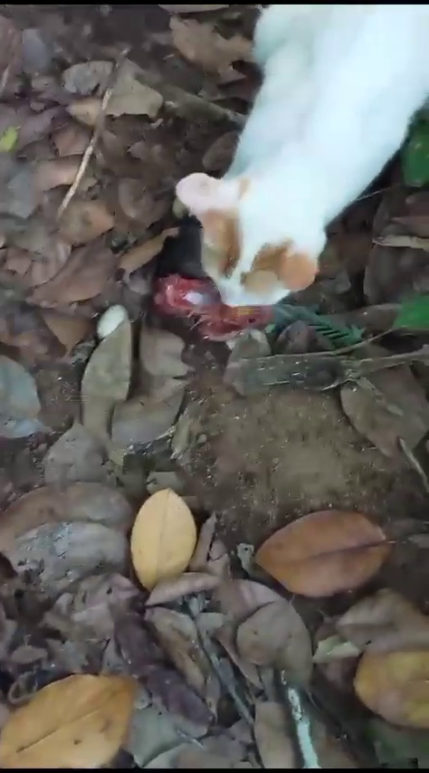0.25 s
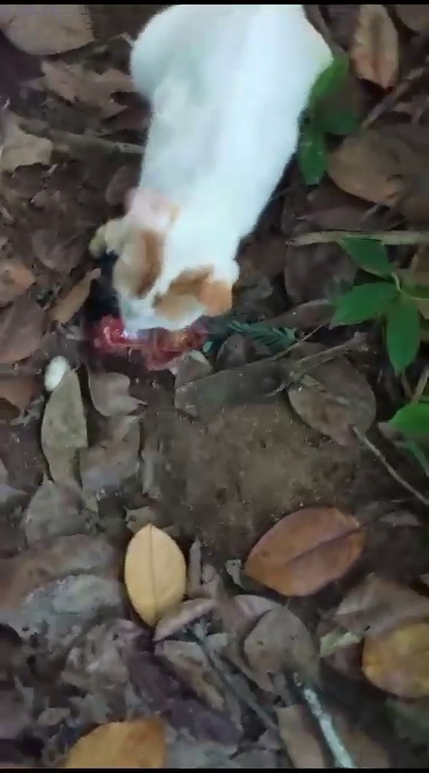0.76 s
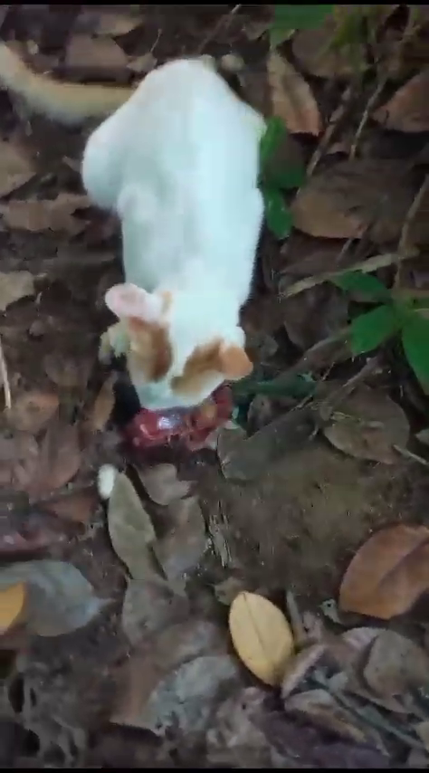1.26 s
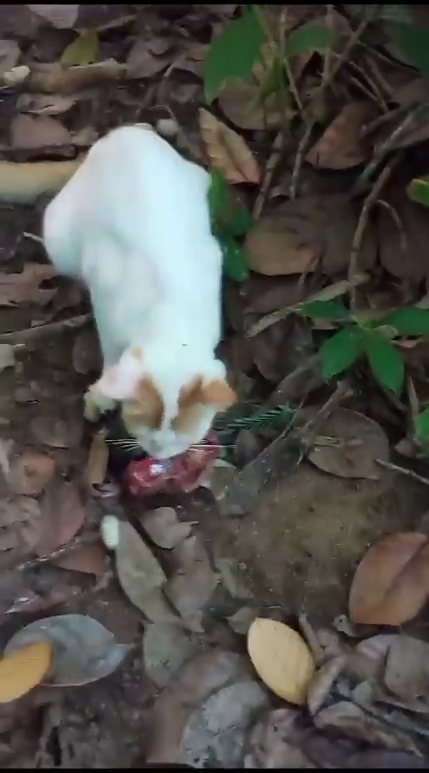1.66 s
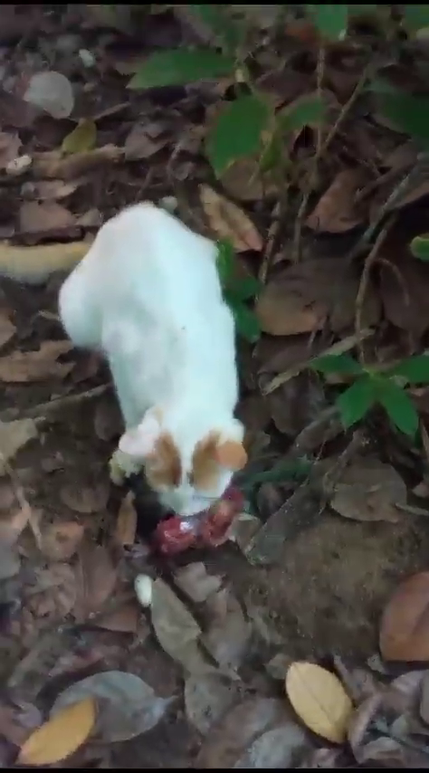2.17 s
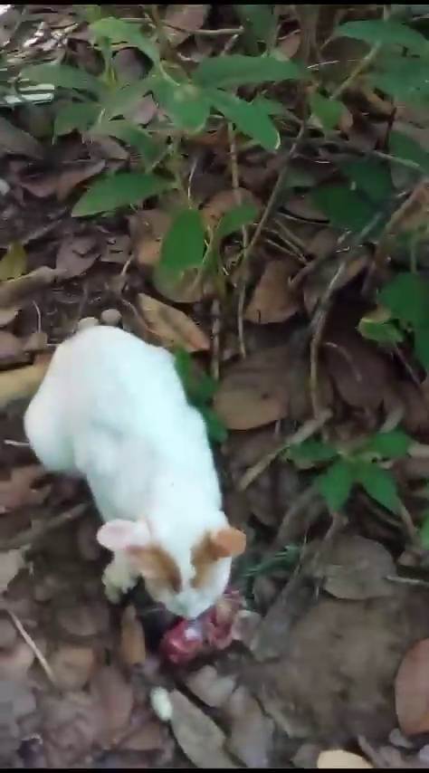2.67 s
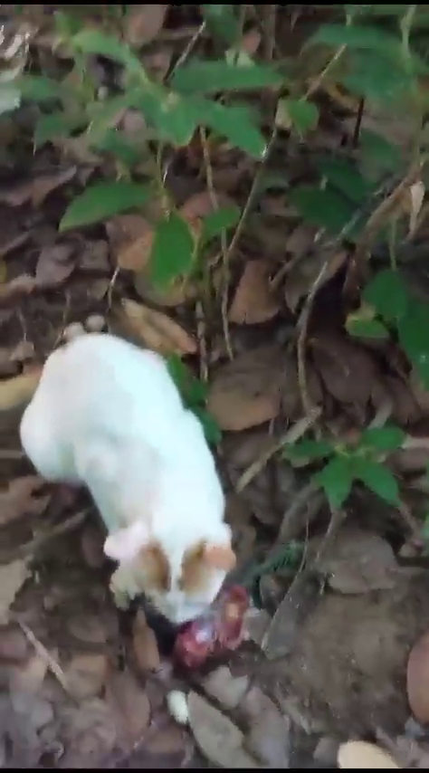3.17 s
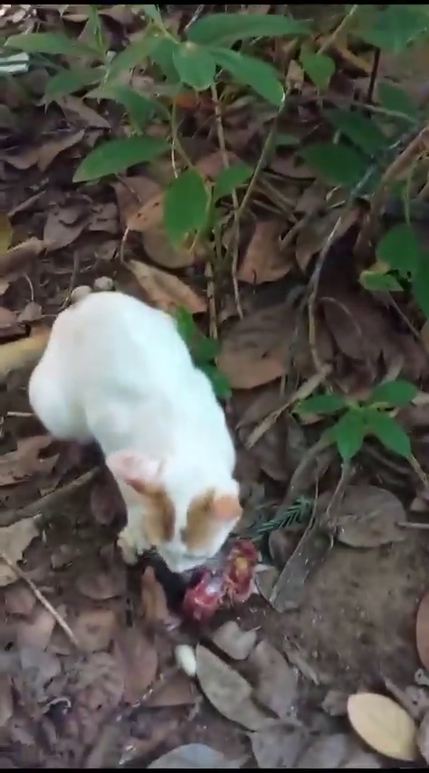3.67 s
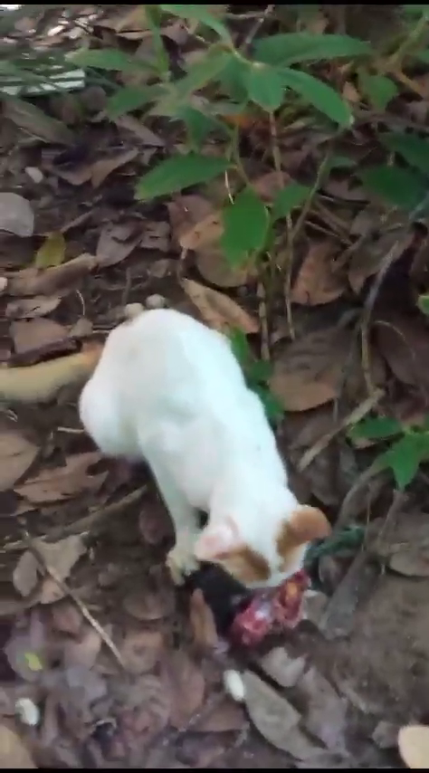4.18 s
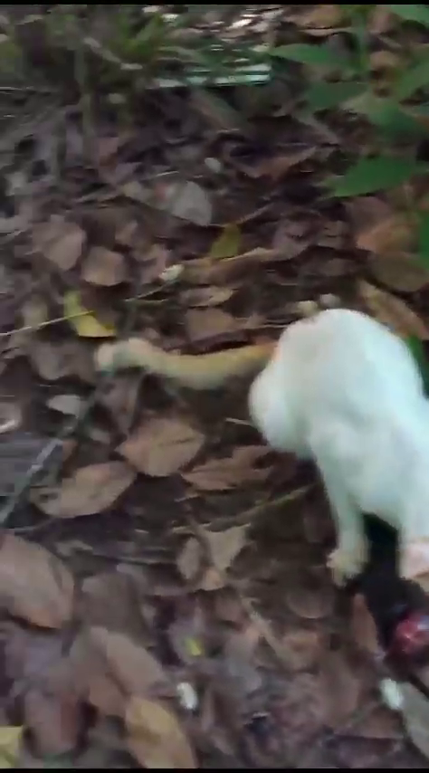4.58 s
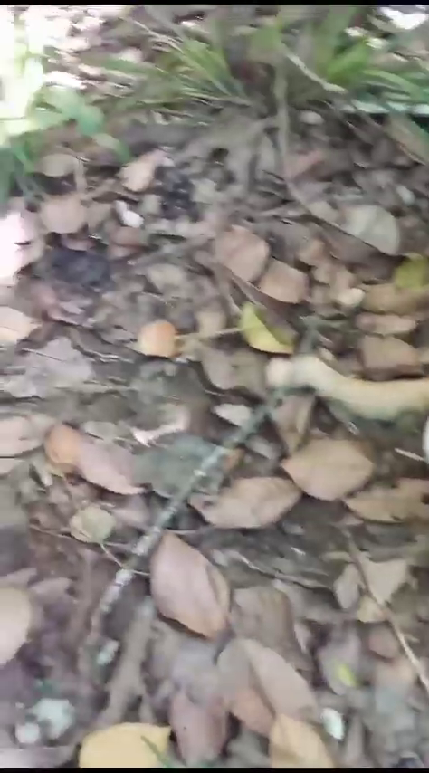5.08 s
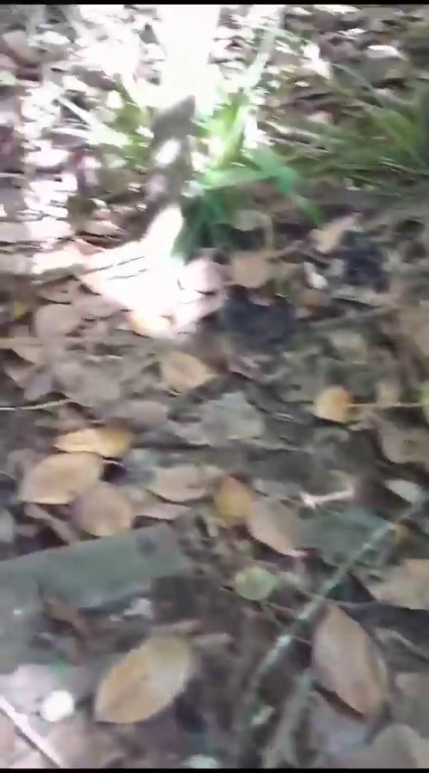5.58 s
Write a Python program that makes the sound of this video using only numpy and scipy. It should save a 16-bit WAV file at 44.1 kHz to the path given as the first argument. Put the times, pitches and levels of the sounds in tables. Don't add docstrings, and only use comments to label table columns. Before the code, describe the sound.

A hand-held microphone is close to dry leaf litter in woodland. Far insects chirr throughout in shrill, rapid clicking over a low, gusty air rumble. From 0 seconds leaves rustle with papery fizz and lower scraping; a small knock comes at 0.3, and the tearing thickens between 0.5 and 0.75 with sharp, brittle snaps. A faint sinking cat moan runs from 0.7 to 1.3 as the rustle eases, with scattered crackles and a soft thump at 1.5. A short, higher mew at 1.9 leads to the loudest event at 2.1: a twig cracks and thuds into soil. Crackling tails off, stirs again at 2.7 with a brief moan, and bursts hard at 3.1. A sharp snap follows at 3.35 and low, weak moans from 3.6 to 3.9. Then only tiny ticks remain as upper insect chirring grows clearer. Near 5.6 a hoarse bird call and thin, clear whistles close the scene.

```python
import sys
import numpy as np
from scipy import signal
from scipy.fft import rfft, irfft, next_fast_len
from scipy.io import wavfile
from scipy.ndimage import uniform_filter1d

SR = 44100
rng = np.random.default_rng(int(sys.argv[2]) if len(sys.argv) > 2 else 0)


def makeup_ratio(level_db):
    decades = np.asarray(level_db, float) / 20
    return 10 ** decades


def wav_record(signal):
    frames = np.transpose(np.atleast_2d(signal))
    bounded = np.clip(frames, -1, 1)
    quanta = np.round(bounded * 32767).astype(np.int16)
    wavfile.write(sys.argv[1], SR, quanta)


N = 256662


def evened(x):
    return x / np.sqrt(np.mean(x ** 2) + 1e-20)


def read(points, hz):
    f, value = np.transpose(points)
    return np.interp(np.log(hz + 1), np.log(f + 1), value)


def curves(rows, t):
    s, *columns = np.transpose(rows)
    return [np.interp(t, s, column) for column in columns]


def add(mix, s, sound):
    part = mix[round(s * SR):][:len(sound)]
    part += sound[:len(part)]


def colour(x, points):
    size = next_fast_len(len(x))
    gain = makeup_ratio(read(points, np.fft.rfftfreq(size, 1 / SR)))
    return irfft(rfft(x, size) * gain, size)[:len(x)]


def band_rms(x, lo_hz, hi_hz):
    hz = np.fft.rfftfreq(len(x), 1 / SR)
    band = rfft(x)[(hz > lo_hz) & (hz < hi_hz)]
    return np.sqrt(2 * np.sum(abs(band) ** 2)) / len(x)


def resonate(x, hz, width_hz):
    r = np.exp(-np.pi * width_hz / SR)
    return signal.lfilter([1 - r], [1, -2 * r * np.cos(2 * np.pi * hz / SR), r * r], x)


def decay(x, seconds):
    return signal.lfilter([1], [1, -np.exp(-1 / (seconds * SR))], x)


def wander(seconds):
    size = max(round(seconds * SR), 2)
    return evened(uniform_filter1d(uniform_filter1d(rng.standard_normal(N), size), size))


def below(x, hz):
    return signal.oaconvolve(x, signal.firwin(511, hz, window=("kaiser", 10), fs=SR), "same")


def voices(notes, overtones, waver):
    out, drift = np.zeros(N), wander(.008)
    for rows in notes:
        t = np.arange(rows[0][0], rows[-1][0], 1 / SR)
        hz, db = curves(rows, t)
        wavering_hz = hz * (1 + waver * drift[(t * SR).astype(int)])
        angle = 2 * np.pi * np.cumsum(wavering_hz) / SR
        tone = sum(makeup_ratio(d) * np.sin(k * angle) for k, d in overtones)
        add(out, t[0], makeup_ratio(db) * tone * signal.windows.tukey(len(t), .15))
    return out


def air():
    # time in seconds, strength of the moving air in dB.
    gust_rows = [(0, 7), (.76, 2.5), (1.33, -1.5), (1.94, 4), (2.43, -1), (3.4, -1), (3.62, 2.5), (4.15, 3),
                 (4.8, -0.5), (5.82, 1)]
    # frequency in Hz, level per Hz in dB.
    rumble_spectrum = [(8.8, -36.5), (15, -19.5), (53, 5), (65, 7.5), (134, 2), (153, -12), (166, -21.5),
                       (200, -18), (260, -48), (440, -120)]
    wash_spectrum = [(88, -31.5), (150, 0.5), (363, -5), (618, -6), (2870, -23), (4870, -16.5), (5480, -19),
                     (6680, -16.5), (9150, -20), (15000, -23.5), (16500, -40.5)]
    gust_db, = curves(gust_rows, np.arange(N) / SR)
    thrash = uniform_filter1d(makeup_ratio(stirring()[1] - 9), size=4000)
    rumble_db = -63 + .7 * gust_db
    wash_db = 20 * np.log10(np.hypot(makeup_ratio(-63 + .75 * gust_db), thrash))
    rumble = colour(rng.standard_normal(N) * makeup_ratio(1.4 * wander(0.035)), rumble_spectrum)
    wash = colour(rng.standard_normal(N) * makeup_ratio(0.98 * wander(0.0413)), wash_spectrum)
    return evened(rumble) * makeup_ratio(rumble_db + 2.5) + wash * makeup_ratio(wash_db - 3.5) / band_rms(wash, 100, 1460)


def chorus(singers):
    out = np.zeros(N)
    for hz, width_hz, per_s, db in singers:
        turns = np.cumsum(per_s * (1 + .0012 * wander(.3))) / SR
        clicks = evened(np.diff(np.floor(turns), prepend=0)) + 1.1 * rng.standard_normal(N)
        ring = resonate(resonate(clicks, hz, width_hz), hz, 2.5 * width_hz)
        out += makeup_ratio(db + 1.3 * wander(.1)) * evened(ring)
    return evened(out)


def insects():
    # time in seconds, lower chorus in dB, upper chorus in dB.
    chorus_levels = [(0, -55, -88), (1.3, -62.5, -66.5), (2.8, -65.5, -86), (3.6, -69, -65.5),
                     (4.4, -68, -66), (4.75, -64, -62.5), (5.82, -62, -60.5)]
    # time in seconds, thin singers in dB.
    thin_levels = [(0, -72), (3.4, -69), (4.4, -66.5), (4.75, -74), (5.82, -78)]
    # ring in Hz, width in Hz, clicks per second, level in dB.
    lower = [(5350, 200, 71, -8), (5650, 220, 63, 0), (5880, 220, 83, -2), (6200, 300, 46, 0)]
    upper = [(6490, 55, 61.5, -2), (6640, 180, 72.5, 0), (6830, 180, 59, -1), (7120, 250, 92, -8),
             (7600, 300, 43, -8)]
    thin_singers = [(5400, 70, 77, -10), (5865, 35, 58, 0), (6320, 45, 69, 0), (6785, 35, 71, 2),
                    (7640, 50, 64, -4), (5697, 25, 66, 0), (8600, 60, 74, -11)]
    t = np.arange(N) / SR
    lower_db, upper_db = curves(chorus_levels, t)
    thin_db, = curves(thin_levels, t)
    return makeup_ratio(lower_db) * chorus(lower) + makeup_ratio(upper_db) * chorus(upper) + makeup_ratio(thin_db) * chorus(thin_singers)


def birds():
    # time in seconds, pitch in Hz, level in dB.
    clear_notes = [
        [(5.64, 4200, -81), (5.73, 4215, -69), (5.8, 4220, -75)],
        [(5.75, 4040, -79), (5.79, 3880, -77), (5.818, 3800, -72)],
    ]
    hoarse_notes = [
        [(5.545, 2480, -78), (5.6, 2520, -74), (5.665, 2460, -78), (5.7, 2420, -83), (5.818, 2450, -83)],
    ]
    clear = voices(clear_notes, [(1, 0)], waver=.002)
    return clear + (.5 + wander(.003)) * voices(hoarse_notes, [(1, 0)], waver=.012)


def cat():
    # time in seconds, pitch in Hz, level in dB.
    moans = [
        [(.72, 645, -69), (.9, 615, -71.5), (1.1, 622, -71.5), (1.35, 590, -84)],
        [(1.86, 828, -64), (1.92, 870, -69), (1.99, 850, -64), (2.09, 858, -66.5)],
        [(2.78, 563, -66), (2.86, 544, -66), (2.95, 596, -87)],
        [(3.56, 296, -66), (3.62, 307.5, -61.5), (3.75, 290, -80), (3.9, 291.4, -66)],
    ]
    # multiple of the pitch, level in dB.
    overtones = [(1, 8), (2, -6), (3, -8)]
    return makeup_ratio(3 * wander(.012) - 6) * voices(moans, overtones, waver=.03)


def thuds():
    # start in seconds, level in dB, pitch factor.
    blows = [
        (0.302, -38.5, 5),
        (1.495, -47, 0.97),
        (2.1082, -15.5, 1.026),
    ]
    # mode in Hz, level in dB, time to fall 60 dB in seconds.
    soil = [(60, -2.5, .064), (128, -8, .06), (200, -8, .03), (290, 1, .015), (520, -1, .009),
            (850, -5, .007), (1200, -8, .007), (1950, -8, .012)]
    out, t = np.zeros(N), np.arange(SR // 3) / SR
    for s, db, factor in blows:
        modes = []
        for hz, mode_db, t60 in soil:
            bend = 2 if hz < 150 else 1
            fall = makeup_ratio(mode_db - 60 * (t * factor / t60) ** bend)
            modes.append(fall * np.sin(2 * np.pi * hz * factor * t))
        add(out, s, makeup_ratio(db) * (modes[0] - sum(modes[1:])))
    return out


def stirring():
    # peak in seconds, fizz in dB, scrape against
    # fizz in dB, rise and fall in seconds per 20 dB.
    stirs = [(.04, -43, -11, 0.043, 0.46), (.2, -50.5, -3, 0.19, 0.56), (0.308, -39.5, -7.5, 0.07, 0.053),
             (.39, -46.5, -1.5, 0.26, 0.19), (.444, -41.5, -5, 0.044, 0.18),
             (0.526, -34, -8.5, 0.037, 0.017), (.6, -37.5, -7, 0.16, 0.22), (.644, -34, -14, 0.049, 0.086),
             (.76, -55.5, -16.5, .2, 0.15), (.93, -47, -12.5, 0.13, 0.11), (1.142, -57, -6.5, 0.8, 0.11),
             (1.59, -45.5, -11.5, 0.26, 0.082), (1.782, -52.5, -19.5, 0.034, 0.32),
             (1.961, -38.5, -15, 0.071, 0.05), (2.065, -45.5, -30, 0.094, 0.09),
             (2.109, -31, -15, 0.0016, 0.39), (2.42, -46.5, -25.5, 0.43, 1), (2.675, -37.5, -9, 0.09, 0.16),
             (2.801, -53.5, -1.5, 0.33, 0.057), (2.886, -51, -12, 0.038, 0.15),
             (3.116, -30, -11.5, 0.037, 0.069), (3.232, -57.5, -3, 0.087, 0.47),
             (3.356, -49.5, -22, 0.12, 0.2), (3.68, -60, -44, 0.24, 0.31),
             (.365, -54, -12, .01, 0.014),
        (2.086, -58, 8, 0.023, 0.012),
        (3.083, -36.5, -5.5, 0.013, 0.15),
        (3.64, -63.5, -21, .08, .08),
        (3.85, -68, -7, 0.075, 0.13),
        (4.04, -69, -23, .1, 0.23),
        (4.22, -67.5, -13, 0.24, 0.29),
        (4.4, -76, -2, 0.17, .2),
        (4.64, -67.5, -26, 0.29, 0.15),
        (5.27, -72, -21.5, .2, .2),
    ]
    t = np.arange(0, N + 64, 64)[:, None] / SR
    s, db, scrape_db, rise_s, fall_s = np.transpose(stirs)
    rise = (s - t) / np.maximum(rise_s, .002)
    fall = (t - s) / np.maximum(fall_s, .002)
    each_db = db - 20 * np.maximum(rise, fall)
    creep_db = -62.5 - 16.5 * np.maximum(t[:, 0] - 3.04, 0)
    fizz = (makeup_ratio(each_db) ** 2).sum(1) + makeup_ratio(creep_db) ** 2
    scrape = (makeup_ratio(each_db + scrape_db) ** 2).sum(1) + makeup_ratio(creep_db - 12) ** 2
    return [np.interp(np.arange(N) / SR, t[:, 0], 10 * np.log10(p)) for p in (fizz, scrape)]


def crackle(per_s, spread_db, ring_s, bed_db, clump_db):
    sizes = makeup_ratio(spread_db * np.minimum(rng.exponential(1, N), 1.4))
    puffs = evened(decay((rng.random(N) < per_s / SR) * sizes, ring_s))
    starts = (rng.random(N) < 60 / SR) * rng.random(N)
    clumps = evened(decay(starts, 0.004))
    return (puffs + makeup_ratio(bed_db)) * makeup_ratio(clump_db * clumps) * rng.standard_normal(N)


def patchy(x, patch_db):
    z = signal.stft(x, nperseg=256)[2]
    field = rng.standard_normal(z.shape)
    field = uniform_filter1d(uniform_filter1d(field, size=7, axis=0), size=7, axis=1)
    field = uniform_filter1d(uniform_filter1d(field, size=5, axis=0), size=4, axis=1)
    return signal.istft(z * makeup_ratio(patch_db * evened(field)), nperseg=256)[1][:N]


def rustle():
    # frequency in Hz, level per Hz in dB.
    fizz_spectrum = [(1500, -38), (2500, -6.5), (3900, -2), (5400, -1.5), (6300, -5), (7200, 6.5),
                     (8400, 2), (12000, 5.5), (15700, 2), (17000, 5.5)]
    scrape_spectrum = [(150, -20), (300, -8), (500, -7.5), (1240, -2), (2000, 1.5), (2450, -6),
                       (3400, -5.5), (4800, -4), (6200, -8.5), (9000, -30)]
    fizz_db, scrape_db = stirring()
    dense = np.clip((fizz_db + 48) / 18, 0, .8)
    still = np.clip((-57 - fizz_db) / 6, 0, 1)
    shared = evened(crackle(per_s=450, spread_db=4.5, ring_s=.0004, bed_db=.5, clump_db=1.8))
    shared = np.sqrt(1 - dense) * shared + np.sqrt(dense) * rng.standard_normal(N)
    edges = np.sqrt(1 - dense) * evened(crackle(410, 2.9, 0.00034, -2.0, 1.38))
    lone = evened(crackle(per_s=240, spread_db=3.0, ring_s=.0004, bed_db=-26, clump_db=2.5))
    edges += still * makeup_ratio(0.5) * lone
    fizz = colour(patchy(shared * (1 - 0.51 * still) + 0.41 * edges, patch_db=2.0), fizz_spectrum)
    scrape = colour(patchy(shared + 0.33 * rng.standard_normal(N), patch_db=2.7), scrape_spectrum)
    fizz *= makeup_ratio(fizz_db) / band_rms(fizz, 8000, 15500)
    return fizz + scrape * makeup_ratio(scrape_db) / band_rms(scrape, 1300, 4800)


def breaks():
    # start in seconds, peak in dB, high ring in Hz,
    # low ring against the high in dB, low ring in Hz.
    cracks = [(.3849, -24, 9550, -10, 4480), (.39, -27.5, 14380, -3, 1980),
              (.5415, -18.5, 11700, -13, 5140), (.6395, -13, 6500, -5.5, 4000),
              (.6489, -20.5, 8200, -6, 4050), (.6603, -14.5, 6760, -8, 4300),
              (.6686, -14.5, 14050, -25.5, 3620), (.7194, -18, 7440, 2.5, 5750),
              (.7594, -22.5, 14200, -33, 5300), (.9149, -25, 10800, -10, 4120),
              (1.0719, -27.5, 14900, -4.5, 4870), (1.3106, -29, 7600, -9.5, 2620),
              (1.4946, -19, 11900, -9.5, 4300), (1.4952, -31.5, 6500, -7, 2100),
              (1.6253, -29.5, 13700, -11, 5300), (1.6938, -28.5, 10600, -4.5, 5370),
              (1.8609, -37, 8800, 0.5, 2000), (1.831, -53, 8000, 6, 1900), (2.0583, -25, 11800, -10, 4500),
              (2.1077, -8, 12200, -5, 4320), (2.1087, -14, 9600, -5, 4090),
              (2.2861, -17.5, 9900, -33, 5000), (2.5006, -29.5, 10600, -4.5, 3370),
              (2.713, -21, 12600, -3.5, 4800), (2.8852, -32, 10500, -4, 4000),
              (3.3441, -17, 11500, -10, 3600), (3.3443, -21, 15300, -21, 1500),
              (3.4566, -35, 9100, 0, 3400)]
    # start in seconds, peak in dB, high ring #
    # in Hz, low ring against the high in dB, low ring in Hz.
    more_breaks = [(0.2158, -35.5, 12600.0, 3, 3530), (0.338, -29, 12500.0, -18, 1550.0),
                   (0.3645, -27.5, 12300.0, -19, 1380.0), (0.212, -39, 6500, 3, 1500),
                   (0.3866, -25, 8500.0, -4, 2000), (0.3925, -32, 6500.0, 3, 1890.0),
                   (0.4816, -29, 12300.0, -15, 2760.0), (0.5321, -26, 7100.0, -11, 5340.0),
                   (0.5931, -25, 11500.0, -9, 5340.0), (0.6268, -26, 13400.0, -6, 5340.0),
                   (0.702, -32, 14000.0, -1, 5340.0), (0.7249, -34, 6500.0, -2, 5080.0),
                   (0.805, -36, 14000.0, -19, 5080.0), (0.8395, -41, 12100.0, -15, 3960.0),
                   (0.8903, -39.5, 8600.0, 1, 3230), (0.9016, -38, 12100.0, -12, 3270.0),
                   (0.919, -35, 14000.0, -4, 5340.0), (0.72, -32.5, 6500, -2, 2400),
                   (0.971, -38, 10100.0, -21, 3790.0), (0.9828, -34, 14900.0, -17, 4650.0),
                   (1.0694, -42, 13100.0, -10, 5340.0), (1.0945, -42, 12100.0, -6, 3700.0),
                   (1.1344, -43, 9400.0, 0, 5250.0), (1.3163, -42, 14900.0, -6, 4310.0),
                   (1.4599, -52, 12100.0, -14, 5080.0), (1.4896, -40, 14500.0, -6, 4130.0),
                   (1.7347, -48, 6500.0, -12, 4480.0), (1.748, -47, 11900.0, -16, 5340.0),
                   (1.8202, -42, 14900.0, -4, 4740.0), (1.988, -29.5, 11500.0, -18, 5340.0),
                   (2.013, -38, 12700.0, -21, 3960.0), (2.022, -42, 9900.0, 5, 5340.0),
                   (2.0253, -37, 13000.0, -16.5, 5000.0), (2.0357, -42, 14500.0, -14, 4390.0),
                   (2.0406, -35, 11500.0, -13, 5080.0), (2.0645, -38, 11000.0, -16, 5340.0),
                   (2.087, -41, 15000.0, 6, 4150), (2.2316, -29, 12400.0, -17, 4220.0),
                   (2.271, -35, 12100.0, -17, 4390.0), (2.372, -29, 12700.0, -10, 4700),
                   (2.4152, -32, 11000.0, -3.5, 4130.0), (2.42, -32.5, 10600.0, -7, 5080.0),
                        (2.4693, -34, 12500.0, -13, 3700.0), (2.4741, -36, 12600, -11, 4310.0),
                        (2.4794, -33, 14600, -12, 4570.0), (2.5535, -34, 14800, -19, 5340.0),
                        (2.5563, -31, 15000.0, -18, 5440), (2.5823, -31, 10200, -17, 1720.0),
                        (2.6323, -38, 12700.0, -1, 4570.0), (2.76, -33.5, 7000.0, -2, 3790.0),
                        (2.7885, -42, 9600.0, 1, 3880.0), (2.8445, -42, 9300.0, -15, 4740.0),
                        (2.8579, -43, 13700.0, -14, 5080.0), (2.8799, -38, 7050, 6, 3900),
                        (2.892, -39, 14500.0, -11, 5340.0), (2.9232, -39.5, 9600.0, -1, 4040),
                        (3.1116, -26, 7400, -11, 4300), (2.992, -44, 7100.0, -2, 4100),
                        (3.1192, -23, 7600, -7, 5070), (3.042, -54, 6900.0, -10, 5080.0),
                        (3.0474, -48, 12100.0, -11, 2500.0), (3.1268, -21, 10300.0, -16, 4740.0),
                        (3.1793, -31, 14000.0, -13, 5170.0), (3.218, -43, 7300.0, -9, 3790.0),
                        (3.2261, -38, 12900.0, -11, 4390.0), (3.235, -39, 9900.0, -16, 4570.0),
                        (3.258, -35.5, 10900.0, -14, 3360.0), (3.2789, -39.5, 9900.0, -4.5, 1720.0),
                        (3.2841, -44, 6900.0, -9, 5340.0), (3.2945, -43, 9900.0, -13, 4910.0),
                        (3.3144, -47, 10400.0, -7, 5340.0), (3.3362, -39, 11700.0, -9, 3450.0),
                        (4.176, -58, 9000, 7, 5040), (3.4255, -45, 10400.0, -13, 4650.0),
                        (3.4485, -46, 7800.0, -9, 5170.0), (3.4606, -40, 13900.0, -12, 5340.0),
                        (3.5584, -53, 8900, -12, 5340.0), (3.7462, -49, 9050, -12, 5340.0),
                        (3.9886, -53, 9000, 8, 4000), (4.2177, -48, 13400.0, -12, 4050.0),
                   (0.77, -18.5, 14500, -5.5, 3280), (.6382, -21, 8000, -1, 1730),
                      (.6438, -29, 11000, 1, 4630), (0.6572, -26, 12000, -14, 4860),
                      (.6584, -19, 13000, -5, 3800), (.6622, -25, 7600, -4.5, 1200), (0.69, -32, 8500, -2, 4400),
                      (2.6755, -24.5, 12000, -7, 2510), (2.683, -29, 11880, -4, 4000),
                      (3.065, -50, 9500, -15, 4500), (3.154, -39.5, 9400, 9, 1350), (4.134, -59, 9000, 1, 3400),
                      (3.9968, -52, 13000, -10, 3800), (4.2463, -51, 13000, -10, 5000),
                      (4.199, -54, 13500, -15, 4500), (4.268, -54, 13500, -15, 4500),
                      (4.666, -56, 13000, -12, 4500), (.5418, -30.5, 7000, -0.5, 1940)]
    # start in seconds, peak in dB, low ring against the high in dB,
    # low ring in Hz.
    edge_snaps = [(0.0578, -28, -5, 5530), (0.156, -37, -0.5, 3480), (0.376, -33, -15, 1560),
                  (.5122, -33, -16, 1770), (0.5285, -19, -18, 5340), (.5742, -28.5, 2.5, 4140),
                  (0.585, -23, -3.5, 5340), (.5966, -22.5, -15, 4430), (0.63, -14, -24, 4000),
                  (0.824, -34, -23, 5400), (.894, -34, -16, 3270), (.9554, -25.5, -14.5, 3960),
                  (1.288, -43, -7, 2110), (1.3475, -41, -2.5, 2700), (1.596, -35, -3, 5300),
                  (1.7372, -40, -2.5, 4400), (1.811, -38, -22, 4220), (2.015, -35, -2, 3400),
                  (2.259, -22, -19, 5200), (2.5116, -30.5, -6, 4800), (2.674, -28, -22, 1770),
                  (2.8038, -29, -6.5, 3960), (2.962, -30, -20, 4670), (3.0101, -31, -17, 4000),
                  (3.0497, -48.5, 10, 2720), (3.1115, -19, -10, 4260), (3.1212, -18, -16, 5100),
                  (3.243, -30, -18, 5200), (3.4084, -36, -14, 3960), (3.4419, -30, -38, 2840)]
    # start in seconds, peak in dB, # high ring
    # in Hz, low ring against the high in dB.
    ticks = [(.817, -35, 14900, -20), (.94, -36, 13260, -25), (.989, -36, 7200, -22),
             (1.4461, -46.5, 7300, 4), (1.6334, -28.5, 11200, -16), (1.6735, -38.5, 7300, -5),
             (1.6984, -29.5, 9600, -11), (2.7278, -37, 10420, -9), (2.8297, -32, 13010, -16),
             (2.938, -36.5, 9500, -20), (3.0214, -44, 10340, -22), (3.267, -37, 9650, -2),
             (3.3997, -35, 11400, -24), (3.4256, -51, 7240, -10), (3.5124, -50, 9910, -6),
             (3.6339, -42, 15160, -18), (3.6435, -45, 12060, -16), (3.7231, -44.5, 7840, -5),
             (3.8531, -53, 14130, 1), (3.9884, -36.5, 14900, -24), (4.0268, -51, 9300, -22),
             (4.042, -44.5, 15100, -23), (4.1619, -50, 14200, -14), (4.1746, -48, 10000, -20),
             (4.2133, -44.5, 13700, -6), (4.24, -46, 13520, -17), (4.2946, -42, 13440, -12),
             (4.5103, -53, 9300, -12), (4.6066, -49, 10400, -26), (4.9862, -47, 8180, -13)]
    high = rng.uniform(10300, 16400, len(edge_snaps))
    low = rng.uniform(3800, 5200, len(ticks))
    edges = [(s, db, hz, *dull) for (s, db, *dull), hz in zip(edge_snaps, high)]
    chance_low = [(*tick, hz) for tick, hz in zip(ticks, low)]
    return cracks + edges + chance_low + more_breaks


def snaps():
    full_top_s = [.5415, .7594, .894, .9149, 1.0719, 1.3106, 1.4946, 1.6253, 1.6938, 2.108, 2.713, 2.938,
                  2.962, 3.0101, 3.0214, 3.3442, 3.4419, 3.9882, 4.2946]
    out, t = np.zeros((2, N)), np.arange(1024) / SR
    rows = breaks()
    noise = rng.standard_normal((len(rows), 2, len(t)))
    noise[:, :, 5] = 4.5
    shape = (1 - np.exp(-t / .0001)) * (np.exp(-t / .0003) + makeup_ratio(-16) * np.exp(-t / .0027))
    thin = signal.butter(3, 3200, "high", fs=SR)
    for (s, db, hz, dull_db, dull_hz), (a, b) in zip(rows, noise * shape):
        high = signal.butter(3, .6 * hz, "high", fs=SR)
        bright = evened(signal.lfilter(*high, a))
        bright += 0.78 * evened(signal.lfilter(*thin, resonate(a, hz, 1400)))
        small = signal.butter(3, .62 * dull_hz, "high", fs=SR)
        ring = resonate(resonate(b, dull_hz, 850), dull_hz, 2400)
        dull = evened(signal.lfilter(*small, ring))
        sound = evened(bright) + makeup_ratio(dull_db - 3.0) * dull
        peak = np.sqrt(uniform_filter1d(sound ** 2, size=31).max())
        full_top = int(np.min(abs(s - np.array(full_top_s))) < .002)
        add(out[full_top], s, makeup_ratio(db + 3.5) * sound / peak)
    return out


def scene():
    steady = air() + insects() + birds() + cat() + rustle()
    soft, hard = snaps()
    return (below(steady + soft, 15850) + below(hard + thuds(), 16650))[None]


def top_cut(x):
    return signal.sosfilt(signal.butter(12, 17140, fs=SR, output="sos"), x)


def record(dry):
    held = dry / (1 + abs(dry) ** 6) ** (1 / 6)
    return top_cut(held)


dry = scene()
out = record(dry)
wav_record(out)
```